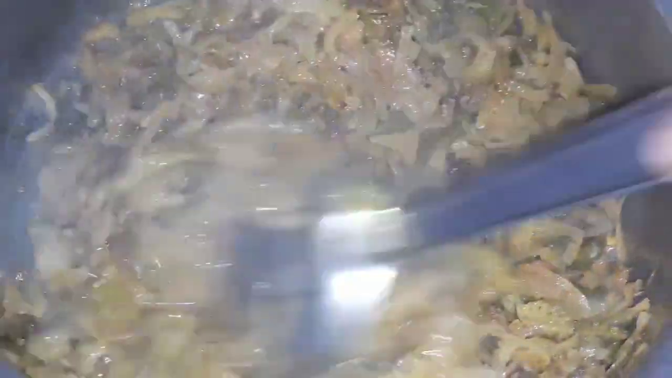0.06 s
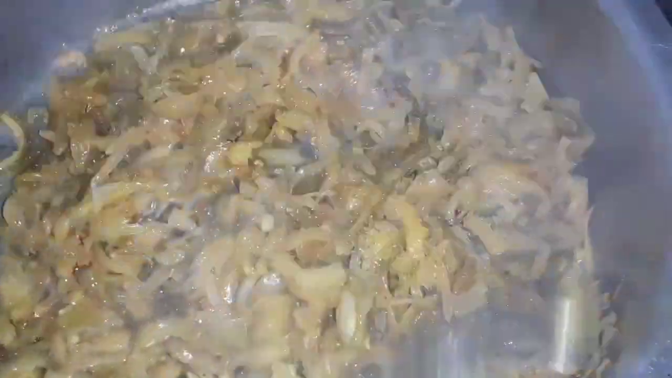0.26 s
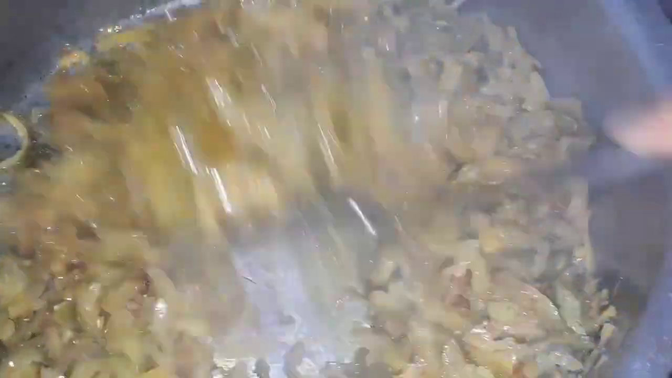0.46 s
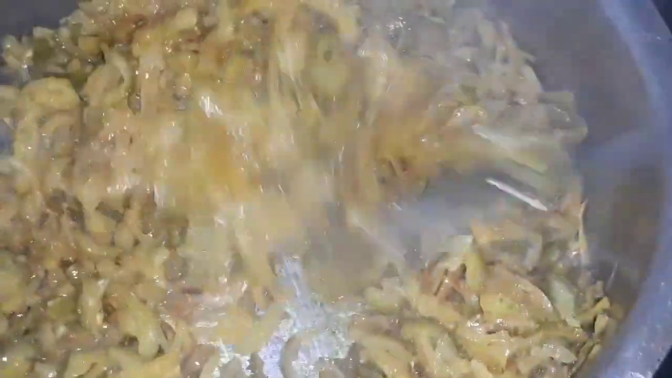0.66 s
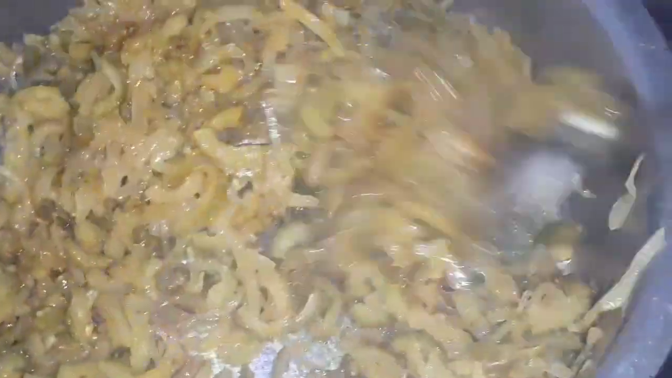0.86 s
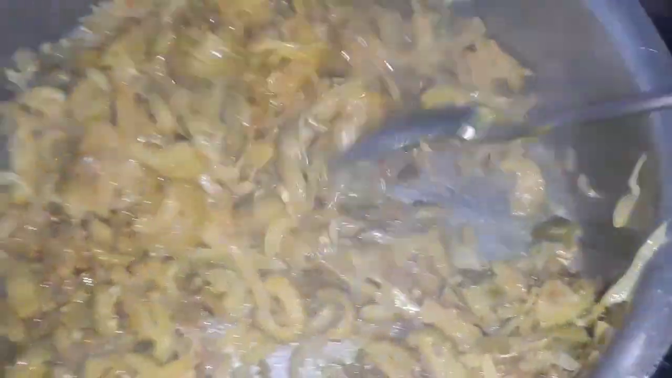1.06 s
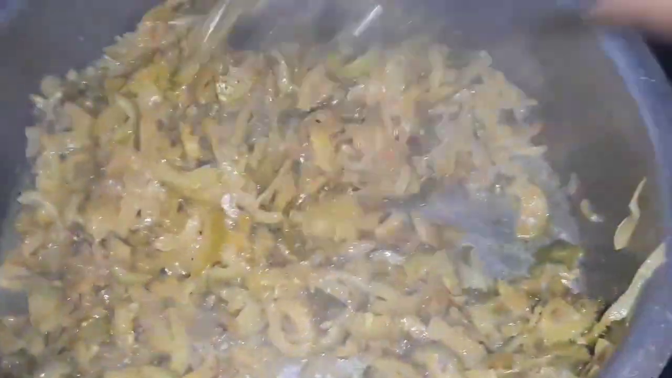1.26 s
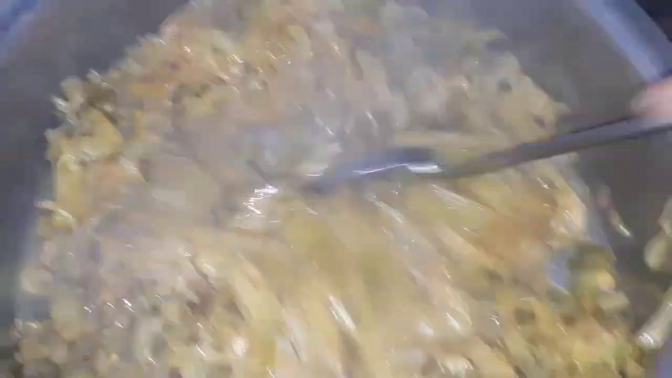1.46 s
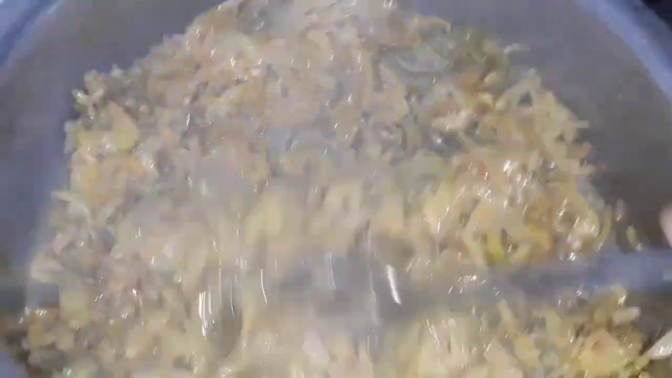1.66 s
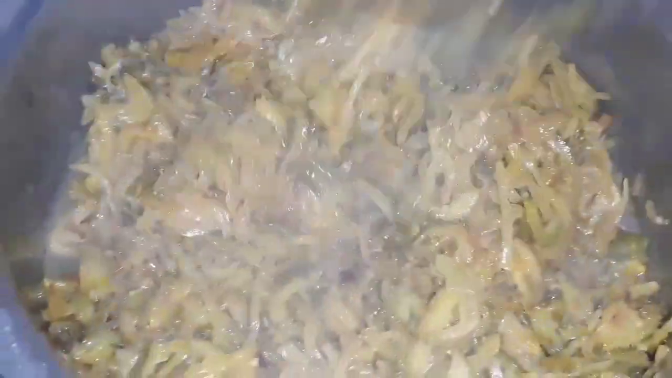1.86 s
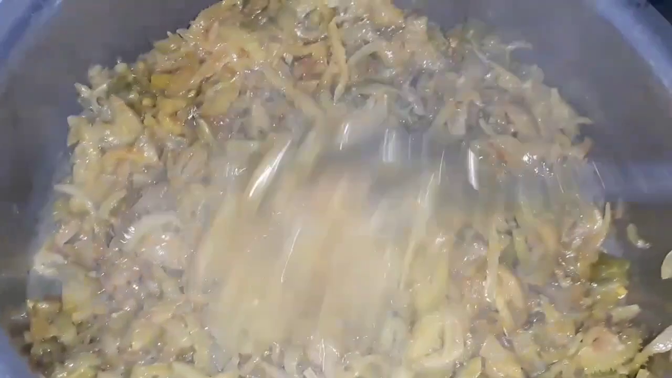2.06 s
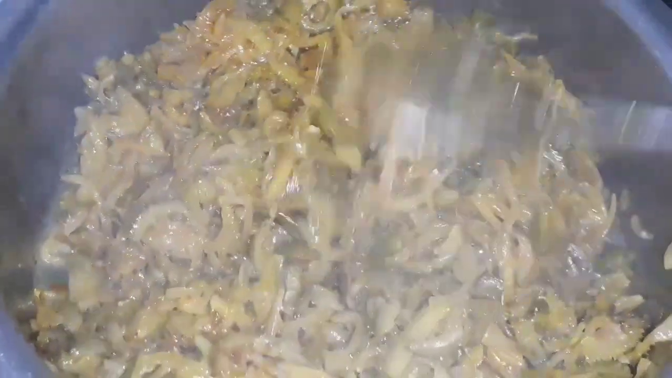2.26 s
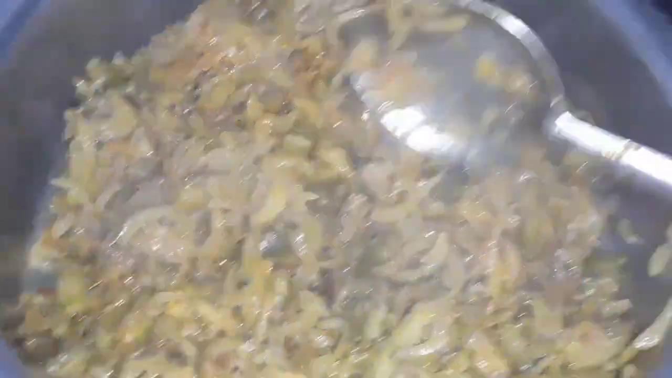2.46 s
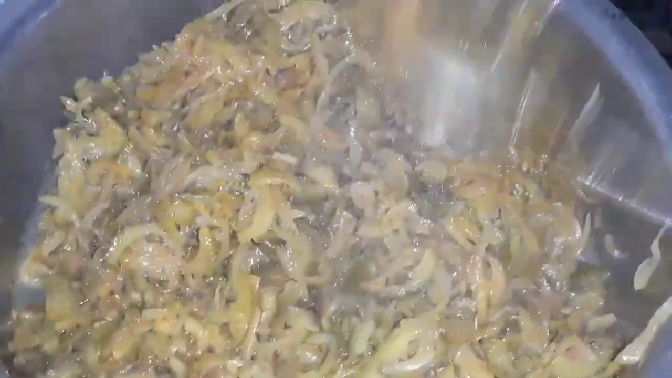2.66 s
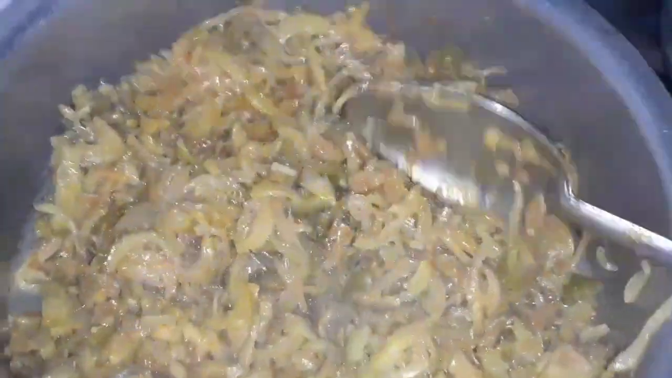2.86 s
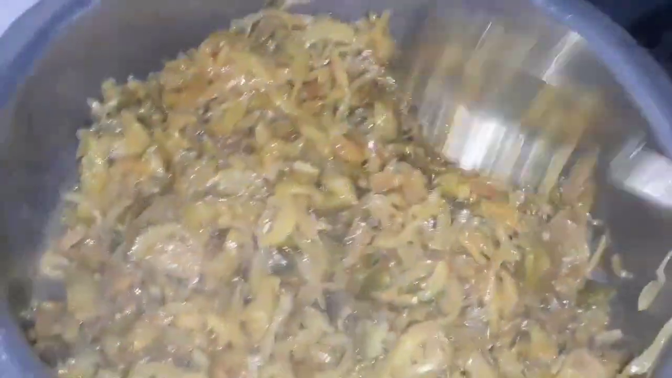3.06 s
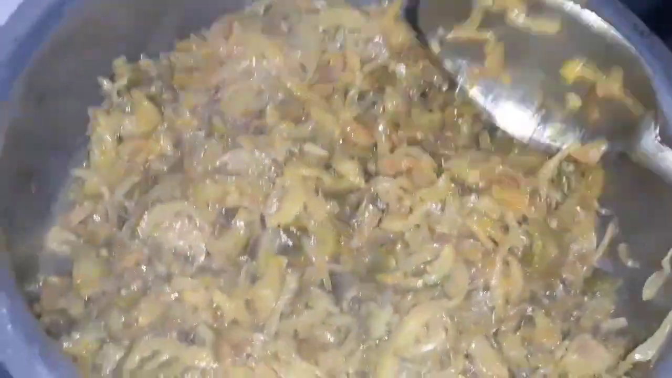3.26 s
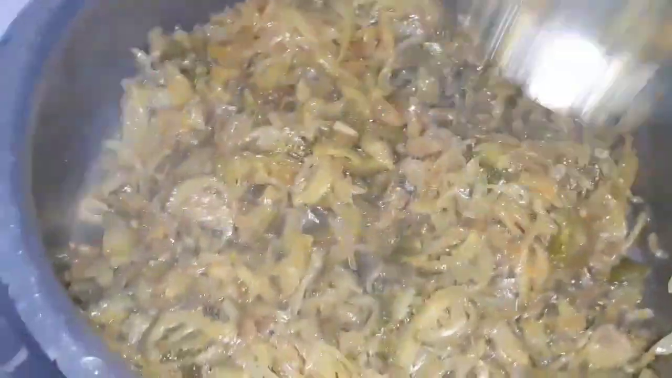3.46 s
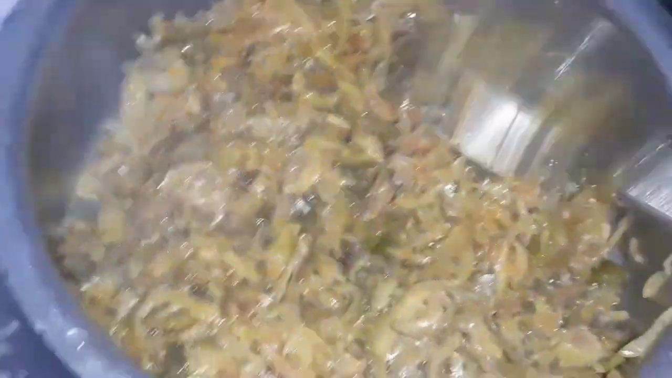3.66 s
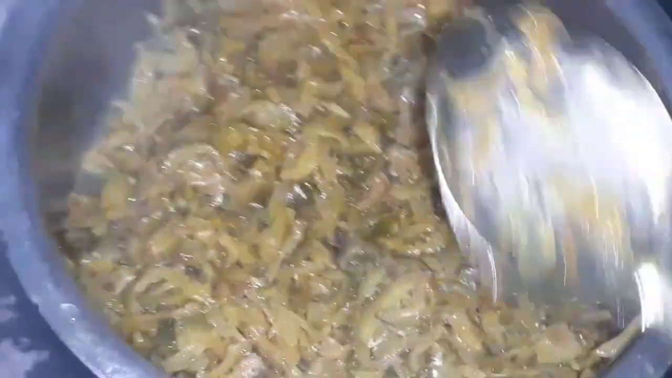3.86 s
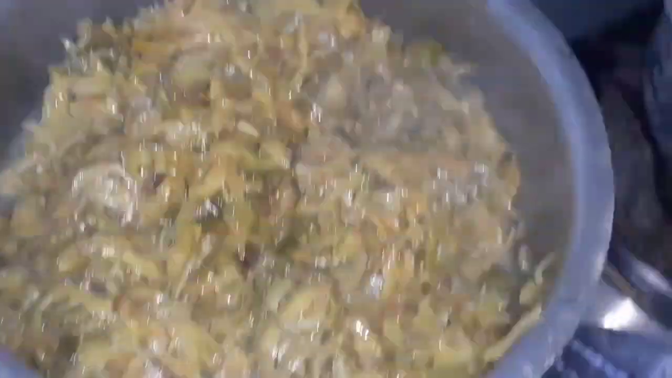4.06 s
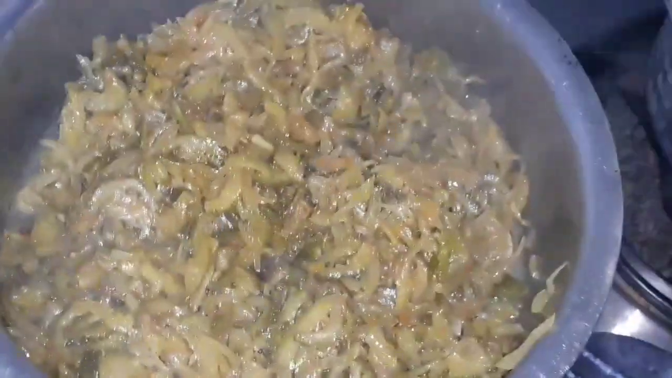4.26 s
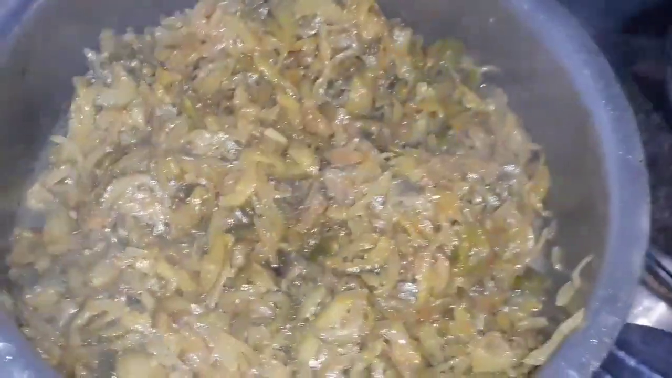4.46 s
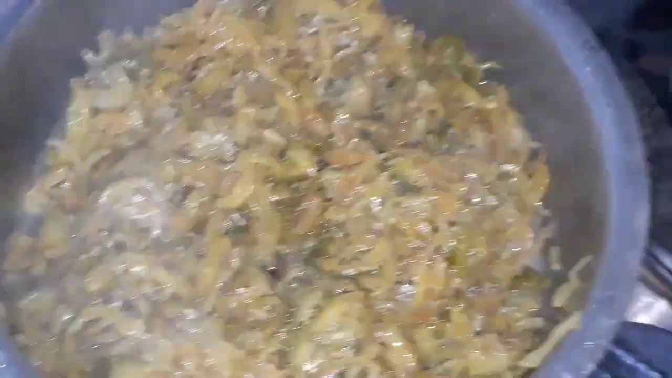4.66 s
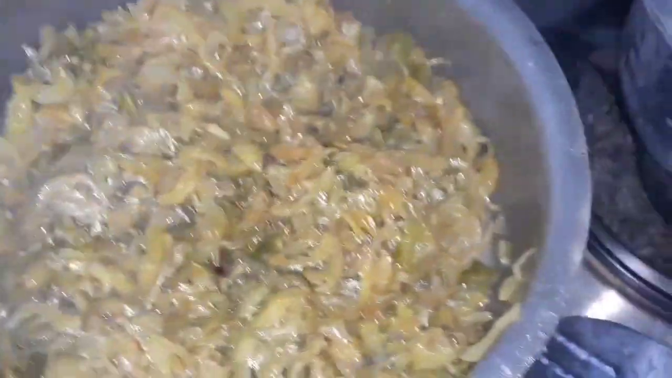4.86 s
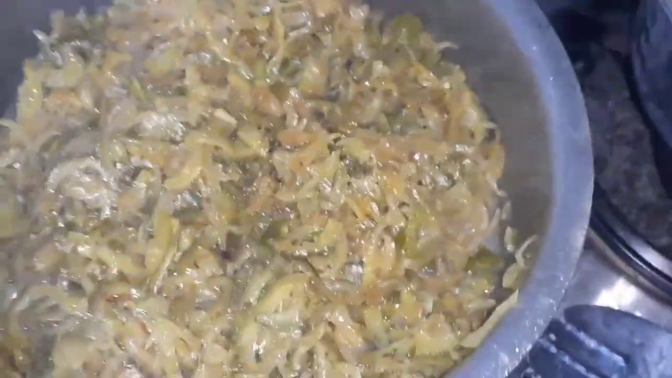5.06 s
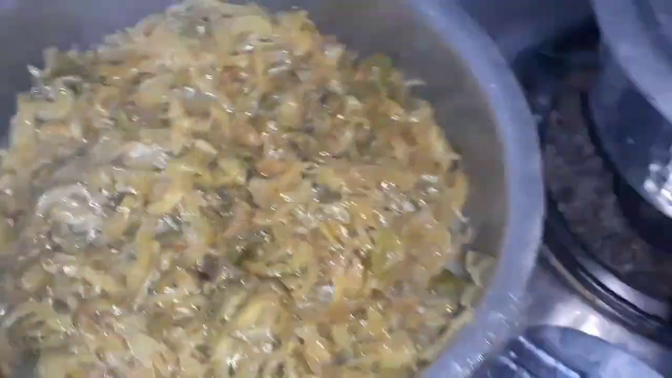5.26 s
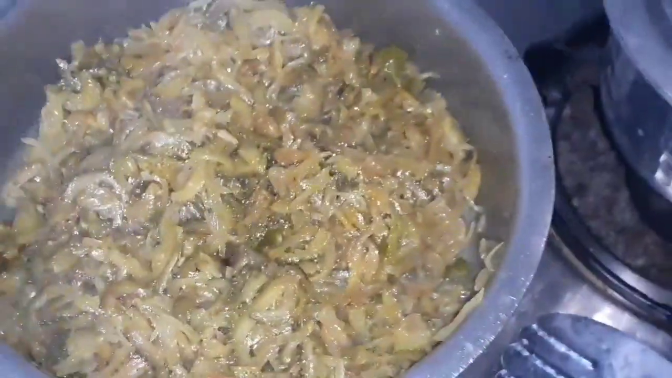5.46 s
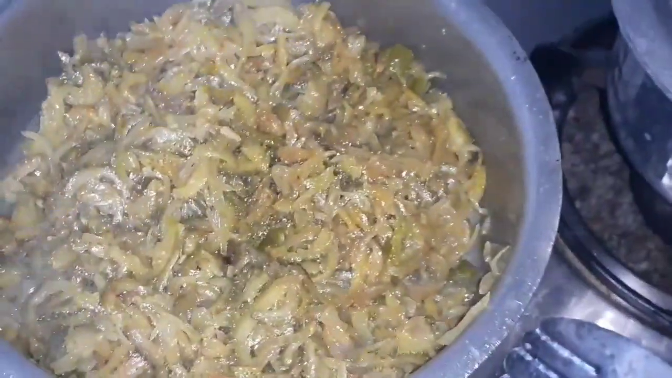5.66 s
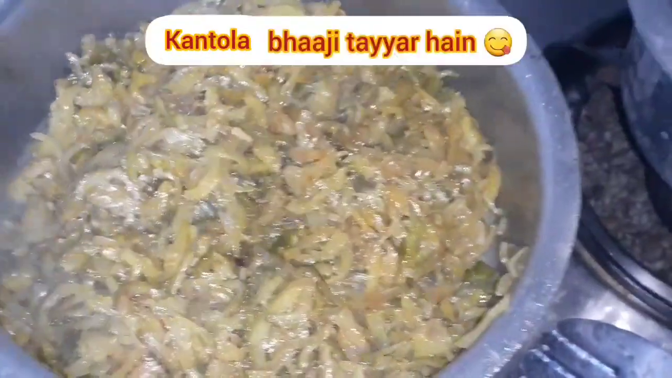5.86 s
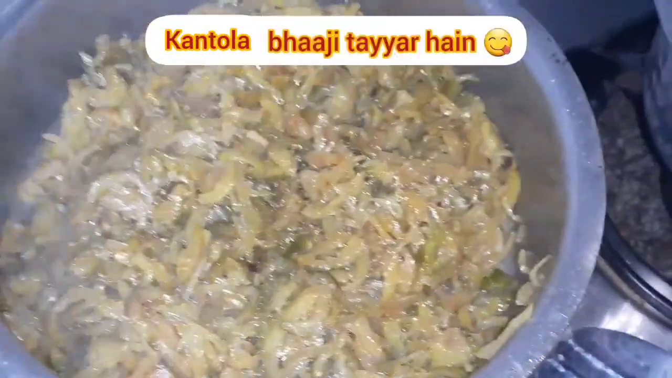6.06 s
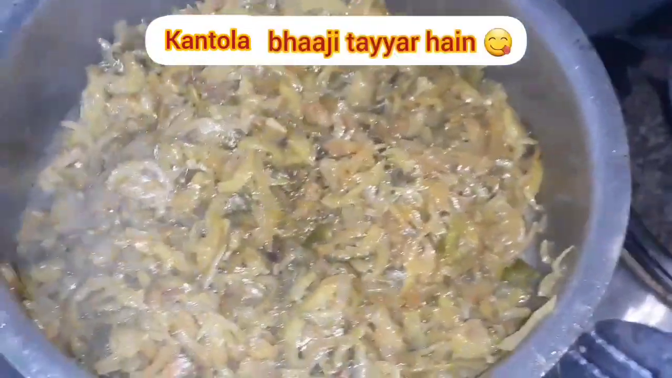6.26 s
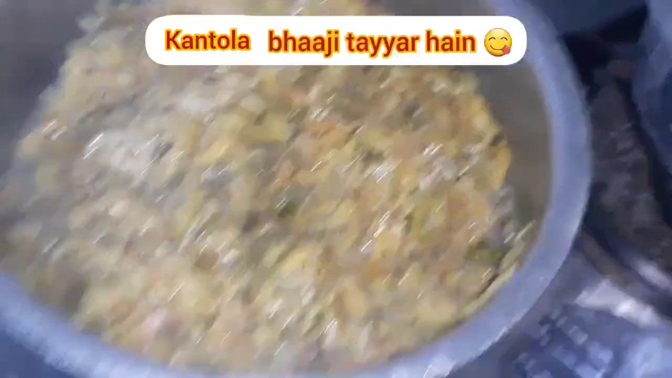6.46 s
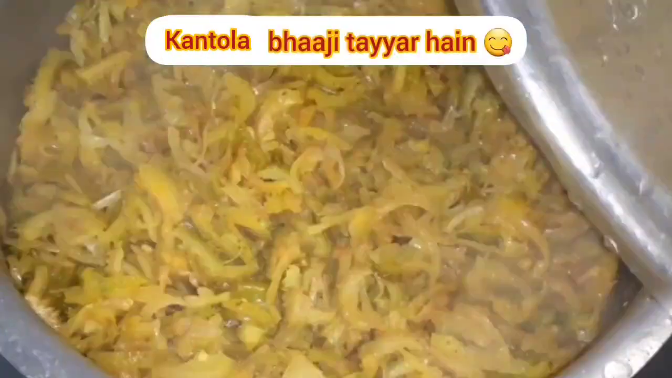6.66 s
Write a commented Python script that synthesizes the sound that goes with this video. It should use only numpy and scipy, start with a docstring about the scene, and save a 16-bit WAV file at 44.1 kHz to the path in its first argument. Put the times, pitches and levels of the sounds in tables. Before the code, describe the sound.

In a small hard kitchen, vegetables sizzle quietly while a steel ladle scrapes and knocks against the pot bottom and the pot rocks dully. A faint tone rises and falls, then six ringing taps hit the rim, with more rocking. The ladle slides harshly onto a steel plate, and a few soft hollow bumps follow. Close stereo microphones catch short echoes.

```python
"""In a small hard kitchen, a steel ladle stirs vegetables that sizzle and spit in a pot.
It scrapes and knocks on the bottom while the pot rocks on its stand and a faint far tone rises and falls.
Then it taps the rim six times, with more rocking, and slides onto a steel plate; something bumps nearby.
Steel is built from dying sine tones driven by blows or tiny slips; food and contact are coloured noise.
Short echoes follow the steel sounds, a drone, rumble and far engine lie below; two microphones listen."""
import sys
import numpy as np
from scipy import signal
from scipy.fft import rfft, irfft
from scipy.io import wavfile
from scipy.ndimage import uniform_filter1d

SR = 44100
rng = np.random.default_rng(int(sys.argv[2]) if len(sys.argv) > 2 else 0)


def store_wav(level_fs):
    """Save 16-bit WAV to argv[1]."""
    pcm = np.round(np.clip(np.atleast_2d(level_fs), -1, 1) * 32767)
    wavfile.write(sys.argv[1], SR, pcm.T.astype(np.int16))


N = 296342  # length in samples

# Levels are relative, before each sound's own offsets. t60 is the time to fall 60 dB before extra damping.
# Level of the background over time; it drops and slowly recovers: t/s, level/dB
BACKGROUND_LEVEL = [(0, -60.5), (.4, -59.5), (1.3, -60), (2.35, -61.5), (2.6, -66), (3.6, -66), (5.2, -66),
                    (6.0, -64.5), (6.55, -62)]
# Rumble over time: t/s, level/dB
RUMBLE_LEVEL = [(.4, -77), (1.3, -78.5), (2.35, -90), (6.0, -91), (6.55, -81.5)]
# Far engine over time: t/s, level/dB
ENGINE_LEVEL = [(3.6, -104), (4.401, -87), (6.0, -87), (6.55, -77.5)]
# Engine tones: multiple of the firing rate, level/dB
ENGINE_TONES = [(1, 0.87), (2, 0.71), (4, -0.92)]
# Noise colour of the frying: f/Hz, level/dB
SIZZLE_COLOUR = [(900, -32.5), (1500, -6), (2120, -4), (4080, 2.5), (9000, -0.5), (12700, 3.5), (15500, 0),
                 (16000, -13.5)]
# Noise colour of the house drone: f/Hz, level/dB
DRONE_COLOUR = [(90, -25.5), (140, -2.5), (350, -10.5), (505, -1), (570, -11.5), (628, 0.5), (700, -5),
                (990, -7.5), (1300, -4.5), (1450, -1.5), (1720, -17.5), (3400, -26.5)]
# Noise colour of the house rumble: f/Hz, level/dB
RUMBLE_COLOUR = [(25, -33.5), (60, -25), (97, 3.5), (125, -5), (170, -16), (260, -46.5)]
# Water drops bursting in the oil: t/s, level/dB
SPITS = [(0.2442, -46), (1.3854, -45), (3.749, -51), (3.7936, -53), (3.9288, -54), (4.0158, -54.5),
         (4.028, -48.5), (4.3845, -48), (4.4228, -52), (5.4338, -51.5), (5.583, -51), (5.8314, -43)]
# Noise colour of the scraping ladle: f/Hz, level/dB
GRIT_COLOUR = [(880, -31), (1500, -4.5), (3000, -8.5), (6630, -5), (7240, -8.5), (16000, -12)]
# Ladle blows on the pot: t/s, pot thud level/dB, pot wall level/dB, ladle ring level/dB,
# muffling by food (factor on decay speed)
BLOWS = [(0.39, -34, -52, -61, 1.5), (0.618, -35, -37, -47, 2), (0.67, -29.5, -42.5, -52, 4.1),
         (0.777, -39.5, -43, -26.5, 1.15), (0.971, -30.5, -35.5, -40.5, 3.8), (1.478, -31, -36, -51.5, 6.2),
         (1.498, -26, -36, -44.5, 3.1), (2.389, -23, -30, -31, 0.95), (2.692, -22.5, -36, -33.5, 0.69),
         (2.853, -21.5, -37, -35, 0.71), (3.013, -20.5, -36.5, -34.5, 0.83), (3.18, -20.5, -32, -32, 0.96),
         (3.34, -20.5, -33, -34, 1.09)]
# Ringing tones (modes) of the pot: f/Hz, level/dB, t60/s
POT_MODES = [(263.8, -16.5, 0.33), (356, -6, 0.074), (410.4, 4.5, 0.047), (446.4, -6, 0.37),
             (524, -10.5, 0.35), (616, -10.5, 0.25), (824, -1.5, 0.17), (924, 6.5, 0.2), (1030, -10, 0.091),
             (1270, 2.5, 0.11)]
# Modes of the ladle: f/Hz, level struck on the bottom/dB, level struck on the rim/dB, t60/s
LADLE_MODES = [(1150, -2, -30, .05), (1270, 1, -30, .2), (1760, -4, -13, .14), (2261, 4, 1, .1),
               (2605, -5, -2, .15), (3165, -4, -20, .17), (3941, -16, -5, .13), (4470, -10, -12, .14),
               (4872, -16, 1, .11), (5190, -16, -4, .13), (6089, -12, -1, .12), (6790, -8, -12, .16),
               (7490, -5, -12, .16), (9500, -14, -10, .14), (11600, -14, -10, .14)]
# The pot rocking on its stand: t/s, thud level/dB
ROCKS = [(0.593, -40.5), (0.789, -43.5), (0.946, -39), (1.139, -48), (1.223, -51.5), (1.287, -56.5),
         (1.998, -60), (2.706, -33.5), (2.733, -30), (2.803, -39.5), (2.893, -31.5), (2.923, -36.5),
         (2.961, -36.5), (3.045, -32), (3.119, -36.5), (3.205, -35.5), (3.281, -38), (3.367, -40),
         (3.433, -40.5)]
# Modes of the stand: f/Hz, level/dB, t60/s
STAND_MODES = [(223, -8, .1), (359.7, 0, 0.067), (422.5, -5.5, 0.14), (1230, -2, 0.05), (1352, 6.5, 0.042),
               (1480, -3, 0.062)]
# Ladle sliding over the plate, one curve a slide: t/s, hiss level/dB
SLIDES = [
    [(4.522, -31.5), (4.56, -34), (4.59, -29), (4.625, -30.5), (4.637, -38.5), (4.69, -33), (4.708, -33.5),
     (4.75, -39.5), (4.78, -44), (4.915, -62)],
    [(4.918, -42.5), (4.945, -43.5), (5.02, -61), (5.06, -74)],
]
# Modes of the plate: f/Hz, nominal width/Hz, level/dB
PLATE_MODES = [(865, 37, -10.5), (1102, 69, -5), (2581, 35, 1.5), (2740, 58, 4), (2800, 26, -3.5),
               (3045, 34.2, -5.5), (4840, 39, -4.5), (5450, 30, -8), (6290, 46, 2), (6500, 26, -10),
               (6900, 29, -2.5), (7750, 80, -3), (11900, 34, -8.5)]
# Noise colour of steel chattering on steel: f/Hz, level/dB
CHATTER_COLOUR = [(59, -53.5), (100, -28), (836, -7), (1480, -8), (2130, -5), (2420, -9), (6840, -4),
                  (16000, -12.5)]
# Moments when the edge catches and squeals: t/s, level/dB, hold/s
CATCHES = [(4.54, -42.5, 0.02), (4.607, -40.5, 0.0091), (4.71, -38, 0.035), (4.934, -51, 0.016)]
# Edge modes that squeal: f/Hz, level/dB, t60/s
SQUEAL_MODES = [(2172, 0, .08), (3790, -6, .07)]
# Soft bumps on the counter: t/s, low push level/dB, lower ring level/dB, upper ring level/dB
BUMPS = [(6.164, -56, -62.5, -59), (6.188, -53.5, -70, -63), (6.322, -48, -59, -48), (6.334, -53, -67, -44),
         (6.357, -56.5, -50, -57), (6.372, -61, -52, -54), (6.409, -47.5, -57, -57),
         (6.426, -53.5, -48, -55), (6.472, -55.5, -73, -82)]
# Hollow modes of the bumps: f/Hz, level/dB, t60/s
HOLLOW_MODES = [(637, 0.5, 0.09), (726, -3.5, 0.083), (896, 1.5, 0.07), (1006, -12, 0.076),
                (1190, -8, 0.044)]
# How alike left and right are: f/Hz, likeness (1 = the same)
LIKENESS = [(60, 0.87), (180, 0.94), (550, 0.66), (1650, 0.02), (4970, 0.0011), (15000, 0.01)]
# Colour difference of the microphones: f/Hz, left minus right level/dB
MIC_LEAN = [(60, -2), (240, 0), (950, -1.0), (3770, 0.5), (15000, 0.0)]
# Echo decay of the kitchen: f/Hz, t60/s
KITCHEN_DECAY = [(100, 0.54), (500, 0.31), (2000, 0.31), (15000, 0.098)]

END_S, EDGE_HZ = 6.527, 16200  # the sound stops; nothing much above this frequency
RIM_FROM_S = 2.2  # later blows land on the rim
TWIN_DB, TWIN_HZ = -6, (14, 45)  # each mode of the dented steel has a weaker neighbour this far away
DRONE_DB, DRONE_FOLLOWS = -68, 1.39  # level at the start; dB it moves per dB of the background level
ENGINE_HZ = 53  # average firing rate
POPS_PER_S, POPS_DB, POP_LOW_HZ, POP_TOP_HZ, POP_S = 14, -17, 3200, 5800, .008
# The ladle dragged over the bottom: it digs in, holds and lifts off
SCRAPE_S, DIG_S, DRAG_S, LIFT_S = .39, 0.067, 0.076, 0.085  # start, then three lengths
DRAG_POT_DB, DRAG_GRIT_DB = -41.5, -39  # while it holds
DIG_POT_DB, DIG_GRIT_DB = -9.5, -20  # first touch, relative to the hold
LIFT_POT_DB, LIFT_GRIT_DB = -33, -24  # lift-off, relative to the hold
# Pairs: (on the bottom, on the rim)
CRACK_DB = (-3, 4)  # contact crack relative to the ladle ring
GAP_DB = (-6.5, -11.5)  # rattle near 3.4 kHz relative to the ladle ring
CLACK_DB = (-11.5, -3.5)  # rocking clack relative to the thud: (while stirring, during the rim taps)
WHISTLE_S, WHISTLE_LENGTH_S, WHISTLE_DB, WHISTLE_DIP_DB = 1.8, .31, -73, -8  # fainter at its top
WHISTLE_LOW_HZ, WHISTLE_TOP_HZ, WHISTLE_TOP_AT_S = 770, 960, .18
PLATE_DB, LANDING_DB, LANDING_S = -4, 9.5, 0.023  # ring over hiss; extra on landing, dying away
CHOKE_FROM_DB, CHOKE = -35.5, 0.9  # louder hiss means pressure, which chokes the plate (dB per dB)
CATCH_RISE_DB_PER_S, CATCH_FADE_DB_PER_S = 900, 496.5


def gain_of(db):
    """Turns decibels into a factor."""
    return 10 ** (np.asarray(db) / 20)


def evened(x):
    """Scales a signal to an average strength (rms) of 1."""
    return x / np.sqrt(np.mean(x ** 2) + 1e-20)


def wander(n, size):
    """Smoothed random drift of rms 1; a larger size in samples drifts more slowly."""
    return evened(uniform_filter1d(rng.standard_normal(n), size=size))


def read(points, hz):
    """Reads a table of f/Hz and value along a log-frequency axis."""
    f, value = np.transpose(points)
    return np.interp(np.log(hz + 1), np.log(f + 1), value)


def likeness(hz):
    """How alike the two channels are at each frequency."""
    return np.clip(read(LIKENESS, hz), -1, 1)


def set_levels(modes, points):
    """Reads one level for each mode, shaped as a column."""
    return read(points, np.array(modes)[:, :1])


def add(mix, s, sound):
    """Mixes a two-channel sound in at s seconds."""
    part = mix[:, round(s * SR):][:, :sound.shape[1]]
    part += sound[:, :part.shape[1]]


def follow(rows):
    """Start time of a level curve, and its level at every sample."""
    s, level_db = np.transpose(rows)
    t = np.arange(s[0], s[-1], 1 / SR)
    return s[0], np.interp(t, s, level_db)


def hiss(n, colour, patchy_db=0., size=512):
    """Two-channel coloured noise, alike in the bass, with drifting louder and softer patches."""
    frames, hz = 4 * n // size + 6, np.fft.rfftfreq(size, 1 / SR)
    a, b, c, d, patches = rng.standard_normal((frames, len(hz), 5)).T
    patches = uniform_filter1d(patches, size=8, axis=0)
    patches = evened(uniform_filter1d(patches, size=16, axis=1))
    same = likeness(hz)[:, None]
    left, other = a + 1j * b, c + 1j * d
    right = same * left + np.sqrt(1 - same ** 2) * other
    spectrum = np.array([left, right]) * gain_of(read(colour, hz)[:, None] + patchy_db * patches)
    noise = signal.istft(spectrum, nperseg=size, noverlap=3 * size // 4)[1]
    return evened(noise[:, size:size + n])


def ring(modes, levels_db=0., spread_db=2., damping=1.):
    """Dying, beating pairs of tones; levels vary by blow, high ones reach the mics out of step."""
    hz, db, t60 = np.transpose(modes)[:, :, None]
    luck, t = rng.standard_normal((3, len(hz), 1)), np.arange(SR // 3) / SR
    apart = np.arccos(likeness(hz)) * np.sign(luck[0])
    size = gain_of(db + levels_db + spread_db * luck[1] - 60 * t * damping / t60)
    turn = 2 * np.pi * hz * (1 + 0.0028 * luck[2]) * t
    twin_offset_hz = rng.uniform(*TWIN_HZ, hz.shape) * np.sign(luck[2])
    twin = turn + 2 * np.pi * twin_offset_hz * t
    channels = []
    for side in (1, -1):
        pair = np.sin(turn + side * apart / 2) + gain_of(TWIN_DB) * np.sin(twin - side * apart / 2)
        channels.append((size * pair).sum(0))
    return np.array(channels)


def slips(n, per_s, uneven_db):
    """Tiny jerks at random times, of random size and sign."""
    happens = rng.random(n) < per_s / SR
    excess = np.minimum(rng.exponential(1, n), 4)
    sign = rng.choice([-1., 1.], n)
    return evened(happens * sign * gain_of(uneven_db * excess))[None]


def rubbed(modes, n, per_s, uneven_db, damping=0.4):
    """Rubbing: a stream of tiny slips keeps the modes ringing."""
    ringing = ring(modes, damping=damping)
    return evened(signal.fftconvolve(slips(n, per_s, uneven_db), ringing, axes=1)[:, :n])


def ladle_modes(on_rim):
    """The ladle's modes, with the levels for the bottom or the rim."""
    return np.array(LADLE_MODES)[:, [0, 2 if on_rim else 1, 3]]


def frying():
    """Steady sizzle with tiny bursting bubbles, over the house's drone and rumble and a far engine."""
    _, sizzle_db = follow(BACKGROUND_LEVEL)
    n = len(sizzle_db)
    t = np.arange(n) / SR
    drone_db = DRONE_DB + DRONE_FOLLOWS * (sizzle_db - sizzle_db[0])
    rumble_db = np.interp(t, *np.transpose(RUMBLE_LEVEL))
    engine_db = np.interp(t, *np.transpose(ENGINE_LEVEL))
    burst = np.diff(signal.windows.hann(7))
    crackle = np.vstack([signal.oaconvolve(slips(n, 300, uneven_db=3.5)[0], burst, "same")
                         for _ in range(2)])
    sizzle = hiss(n, SIZZLE_COLOUR, patchy_db=.7, size=256)
    sizzle = sizzle + gain_of(-12) * evened(crackle) + pops(n)
    drone = hiss(n, DRONE_COLOUR, patchy_db=2.0, size=2048)
    rumble = hiss(n, RUMBLE_COLOUR, size=4096)
    firing_hz = ENGINE_HZ * (1 + 0.013 * wander(n, 9000))
    turn = 2 * np.pi * np.cumsum(firing_hz) / SR
    engine = sum(gain_of(db) * np.sin(round(k) * turn) for k, db in ENGINE_TONES)
    return (gain_of(sizzle_db) * sizzle + gain_of(drone_db) * drone + gain_of(rumble_db) * rumble
            + gain_of(engine_db) * engine)


def pops(n):
    """Larger bubbles burst now and then: a few ms of mid-treble fizz."""
    puff = signal.windows.hann(round(POP_S * SR))[None]
    puffs = signal.oaconvolve(abs(slips(n, POPS_PER_S, uneven_db=3.)), puff, "same")
    band = signal.butter(2, [POP_LOW_HZ, POP_TOP_HZ], "bandpass", fs=SR, output="sos")
    return gain_of(POPS_DB) * evened(signal.sosfilt(band, puffs * rng.standard_normal((2, n))))


def spit(db):
    """A drop of water bursts in the oil: a bright click of noise that dies at once."""
    t = np.arange(200) / SR
    bright = signal.lfilter([1, -.6], [1], rng.standard_normal((2, 200)))
    return bright * gain_of(db - 60 * t / 0.011)


def scrape():
    """Coarse slips shake the stand, and the pot wall as the ladle nears it; fine ones hiss."""
    turns = np.cumsum([0, DIG_S, DRAG_S, LIFT_S])
    t = np.arange(0, turns[-1], 1 / SR)
    n = len(t)
    pot_db = DRAG_POT_DB + np.interp(t, turns, [DIG_POT_DB, 0, 0, LIFT_POT_DB])
    grit_db = DRAG_GRIT_DB + np.interp(t, turns, [DIG_GRIT_DB, 0, 0, LIFT_GRIT_DB])
    grain = gain_of(1.96 * wander(n, 60))
    grit = grain * hiss(n, GRIT_COLOUR, patchy_db=2.5, size=256)
    grit = grit + gain_of(-16.5) * rubbed(ladle_modes(False), n, 860, 4.7)
    near_wall = np.clip((t - .105) / 0.0089, 0, 1)
    stand = rubbed(STAND_MODES[1:], n, 400, 4., damping=1.2)
    wall = rubbed(POT_MODES[5:9], n, 500, 3.5, damping=3.)
    pot = (1 - 0.44 * near_wall) * stand + (0.39 + 0.45 * near_wall) * wall
    return SCRAPE_S, gain_of(pot_db) * pot + gain_of(grit_db) * grit


def blow(s, thud_db, wall_db, ladle_db, muffling):
    """Pot and ladle ring; the contact cracks for some ms and loose steel rattles on."""
    on_rim = int(s > RIM_FROM_S)
    crack_db = ladle_db + CRACK_DB[on_rim]
    pot_levels = set_levels(POT_MODES, [(520, thud_db - 13.0), (900, wall_db - 10.0)])
    pot = ring(POT_MODES, pot_levels, damping=muffling)
    modes = ladle_modes(on_rim)
    ladle_levels = set_levels(modes, [(3500, ladle_db - 3.5), (4800, crack_db - 12.5)])
    ladle = ring(modes, ladle_levels, damping=muffling)
    t = np.arange(pot.shape[1]) / SR
    colour = [(170, thud_db - 16.5 + 0.8 * muffling), (420, thud_db - 7.0), (1300, wall_db - 5.5),
              (2500, ladle_db - 10.0), (3400, ladle_db + GAP_DB[on_rim]), (4300, crack_db - 10.0),
              (7000, crack_db - 8.5), (15000, crack_db - 16.5)]
    # hiss comes out at rms 1, so the colour's overall strength is put back
    power = np.mean(gain_of(2 * read(colour, np.linspace(0, SR / 2, num=200))))
    crack_shape = gain_of(-60 * t / 0.033)
    rattle_shape = gain_of(-9.5 - 60 * t * muffling / 0.31)
    noise = gain_of(15.5) * np.sqrt(power) * hiss(len(t), colour) * (crack_shape + rattle_shape)
    tick = hiss(len(t), [(3000, -21.5), (7000, -0.5), (15000, -0.5)])
    tick = gain_of(crack_db + 9.5 - 60 * t / 0.025) * tick
    return (pot + ladle + noise + tick) * np.clip(t / 0.0013, 0, 1)


def kitchen(x):
    """Dense echoes for each microphone, each band dying at its own speed."""
    hz, t, z = signal.stft(hiss(SR // 2, [(20, 0), (20000, 0.0033)]), SR, nperseg=256)
    decay = gain_of(-60 * t / read(KITCHEN_DECAY, hz)[:, None])
    tail = signal.istft(z * decay, SR, nperseg=256)[1]
    tail = tail * np.clip(np.arange(tail.shape[1]) / SR / 0.0055, 0, 1)
    # the left channel alone feeds the echoes
    return signal.fftconvolve(x[:1], tail / np.linalg.norm(tail[0]), axes=1)[:, :N]


def rock(thud_db, clack_db):
    """The pot rocks: a short dull knock of cast iron, with a little rattle."""
    levels = set_levels(STAND_MODES, [(520, thud_db - 5.5), (900, clack_db - 20.5)])
    knock = ring(STAND_MODES, levels)
    t = np.arange(knock.shape[1]) / SR
    rattle = hiss(len(t), [(700, -14), (1350, 0), (2000, -19), (6000, -26), (15000, -32)])
    rattle_db = clack_db + 3.4 - 60 * np.maximum(t - .007, 0) / 0.056
    return (knock + gain_of(rattle_db) * rattle) * np.clip(t / 0.0012, 0, 1)


def whistle():
    """A thin, slightly fuzzy tone that rises and falls, out of step between the microphones."""
    t = np.arange(0, WHISTLE_LENGTH_S, 1 / SR)
    arch = np.interp(t, [0, WHISTLE_TOP_AT_S, WHISTLE_LENGTH_S], [0, 1, 0])
    hz = WHISTLE_LOW_HZ + (WHISTLE_TOP_HZ - WHISTLE_LOW_HZ) * arch
    db = WHISTLE_DB + WHISTLE_DIP_DB * arch ** 2
    turn = 2 * np.pi * np.cumsum(hz + 25 * wander(len(hz), 300)) / SR
    tone = np.array([np.sin(turn + 0.19), np.sin(turn - .9)])
    return WHISTLE_S, gain_of(db) * tone * signal.windows.tukey(len(hz), .2)


def slide(rows):
    """Dense chatter of steel on steel keeps the plate's modes going; the plate stands to the left."""
    s, hiss_db = follow(rows)
    n = len(hiss_db)
    t = np.arange(n) / SR
    landing_db = LANDING_DB * np.exp(-t / LANDING_S)
    plate_db = PLATE_DB + landing_db - CHOKE * np.maximum(hiss_db - CHOKE_FROM_DB, 0)
    catch_s, catch_db, hold_s = np.transpose(CATCHES)[:, :, None]
    since = s + t - catch_s
    rise_db = CATCH_RISE_DB_PER_S * since
    fade_db = -CATCH_FADE_DB_PER_S * np.maximum(since - hold_s, 0)
    squeal = gain_of(catch_db + np.minimum(rise_db, fade_db)).sum(0)
    # a wider mode dies faster
    plate = rubbed([(hz, db, 3.65 / width) for hz, width, db in PLATE_MODES], n, 600, 5.1)
    flutter = gain_of(2.07 * wander(n, 100))
    chatter = flutter * hiss(n, CHATTER_COLOUR, patchy_db=2.0)
    steel = gain_of(hiss_db) * (chatter + gain_of(plate_db) * plate)
    steel = steel + squeal * rubbed(SQUEAL_MODES, n, 900, 2.3)
    return s, gain_of([[1.1], [-1.1]]) * np.clip(t / 0.0079, 0, 1) * steel


def bump(low_db, lower_db, upper_db):
    """A dull push of low noise and a short hollow ring."""
    hollow = ring(HOLLOW_MODES, set_levels(HOLLOW_MODES, [(720, lower_db), (890, upper_db)]))
    t = np.arange(hollow.shape[1]) / SR
    colour = [(80, -26), (250, -2), (450, -4.5), (1200, -16.5), (4000, -14.0), (15000, -21.0)]
    push = hiss(len(t), colour, size=1024)
    return (hollow + gain_of(low_db - 60 * t / 0.072) * push) * np.clip(t / 0.0023, 0, 1)


def scene():
    """Near steel sounds and bumps with their echoes, over the frying and the far tone."""
    steel, around = np.zeros((2, N)), np.zeros((2, N))
    add(around, 0, frying())
    for s, db in SPITS:
        add(around, s, spit(db))
    add(steel, *scrape())
    for row in BLOWS:
        add(steel, row[0], blow(*row))
    for s, thud_db in ROCKS:
        add(steel, s, rock(thud_db, thud_db + CLACK_DB[int(s > RIM_FROM_S)]))
    add(around, *whistle())
    for rows in SLIDES:
        add(steel, *slide(rows))
    for s, *levels in BUMPS:
        add(steel, s, bump(*levels))
    # small steel radiates no deep bass
    steel = signal.sosfilt(signal.butter(2, 112, "highpass", fs=SR, output="sos"), steel)
    return steel + gain_of(-9) * kitchen(steel) + around


def record(dry):
    """The two microphones differ a little in colour; the sound stops short; then the band limit."""
    lean_db = read(MIC_LEAN, np.fft.rfftfreq(N, 1 / SR))
    heard = irfft(rfft(dry) * gain_of([lean_db / 2, -lean_db / 2]), N)
    heard = heard * np.clip((END_S - np.arange(N) / SR) / 0.012, 0, 1)
    lowpass = signal.firwin(511, EDGE_HZ, window=("kaiser", 9), fs=SR)
    return signal.oaconvolve(heard, lowpass[None], "same")


dry = scene()
out = record(dry)
store_wav(out)
```